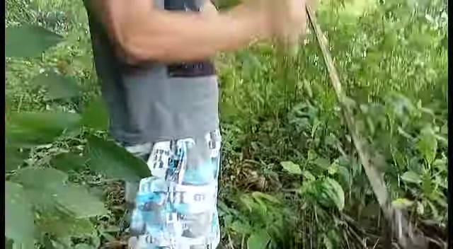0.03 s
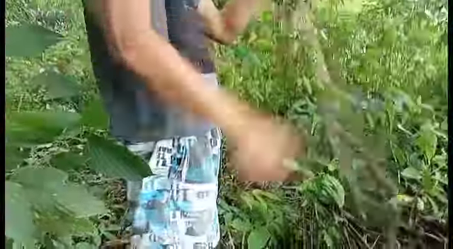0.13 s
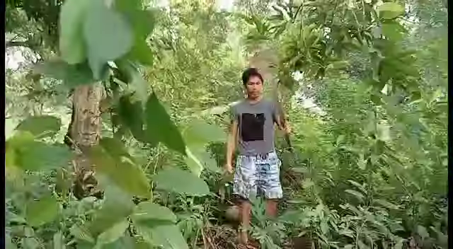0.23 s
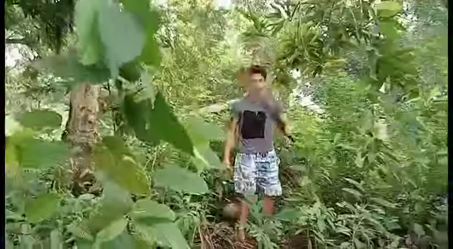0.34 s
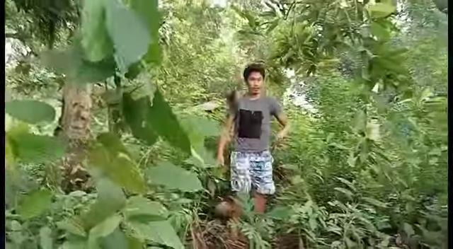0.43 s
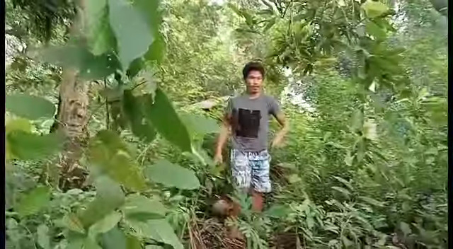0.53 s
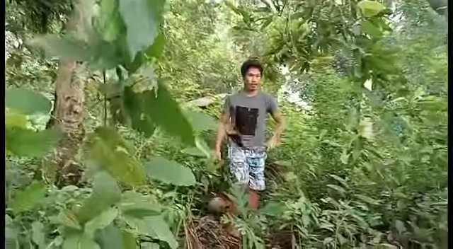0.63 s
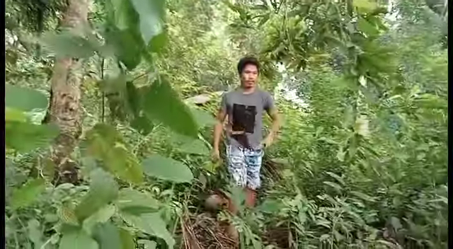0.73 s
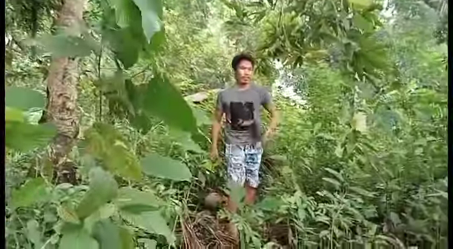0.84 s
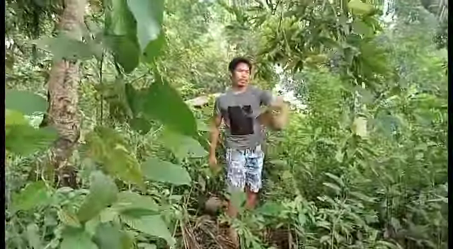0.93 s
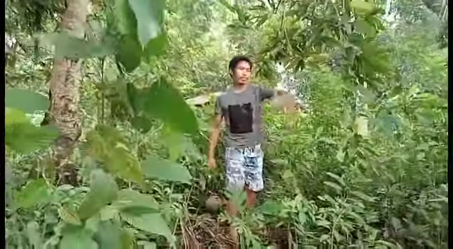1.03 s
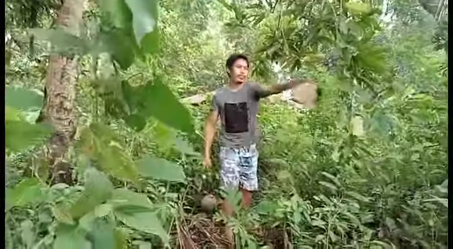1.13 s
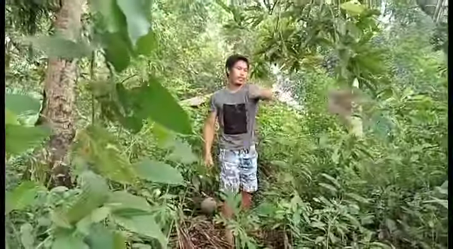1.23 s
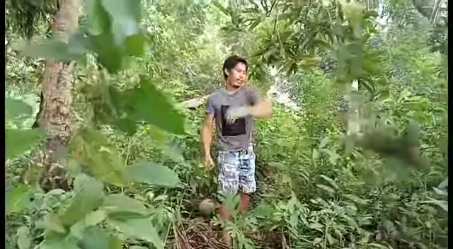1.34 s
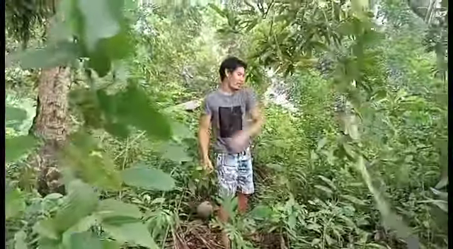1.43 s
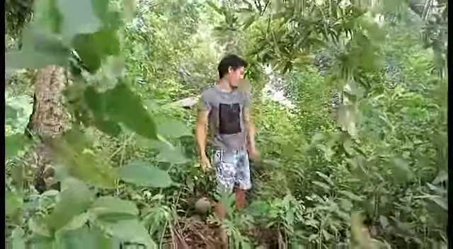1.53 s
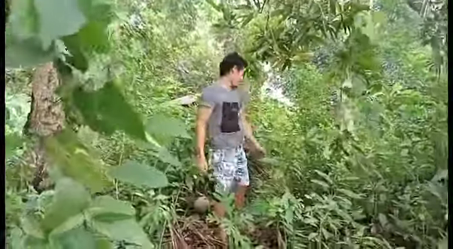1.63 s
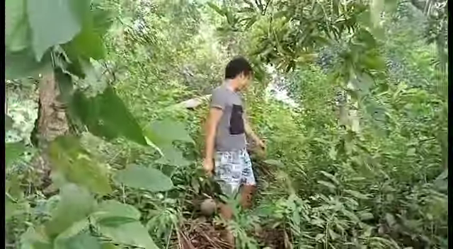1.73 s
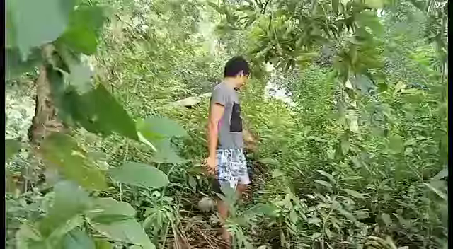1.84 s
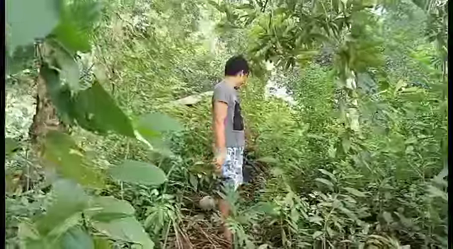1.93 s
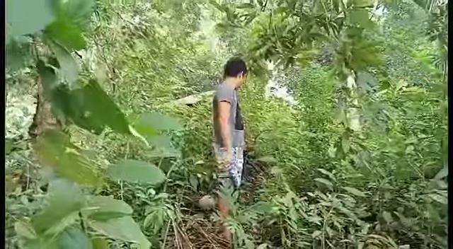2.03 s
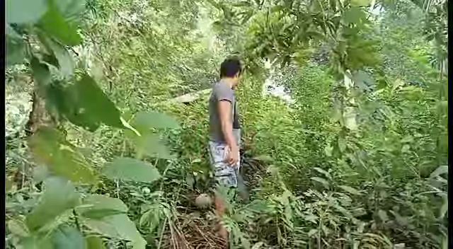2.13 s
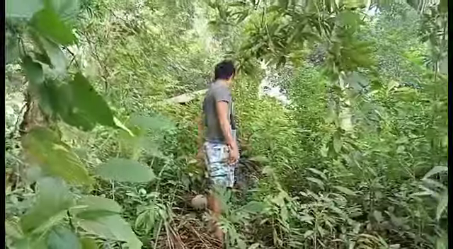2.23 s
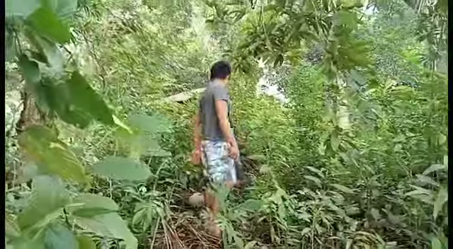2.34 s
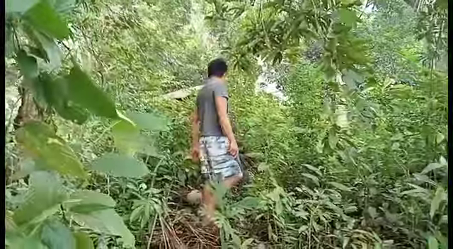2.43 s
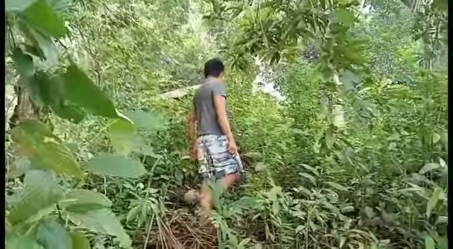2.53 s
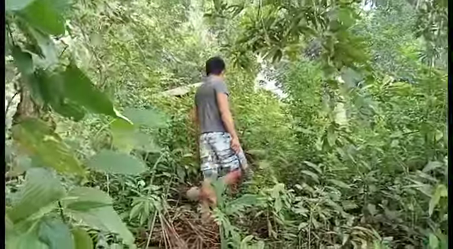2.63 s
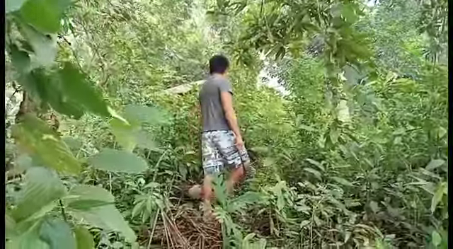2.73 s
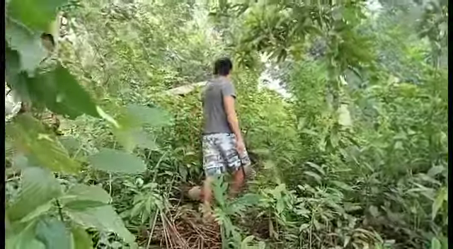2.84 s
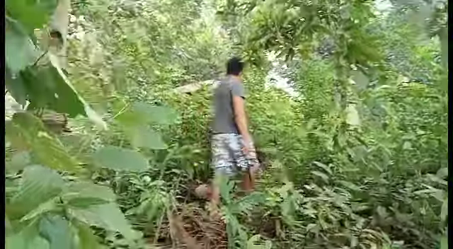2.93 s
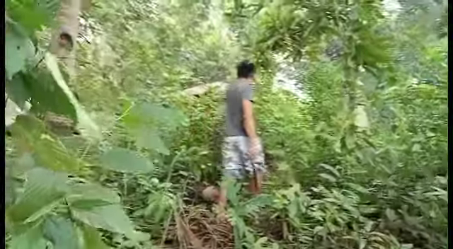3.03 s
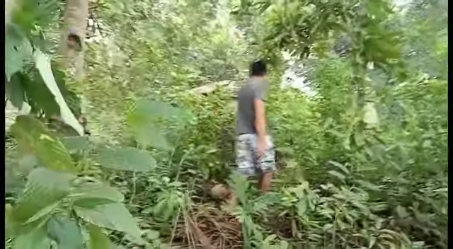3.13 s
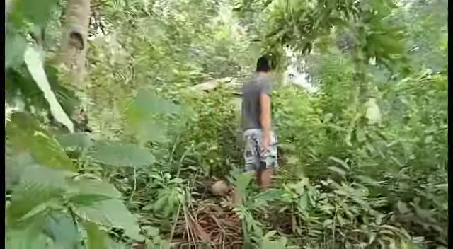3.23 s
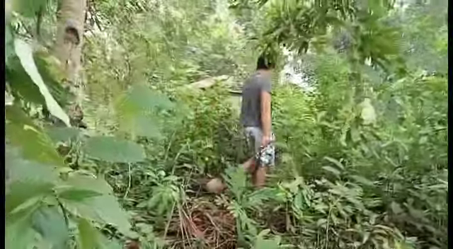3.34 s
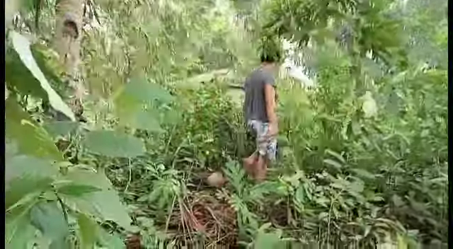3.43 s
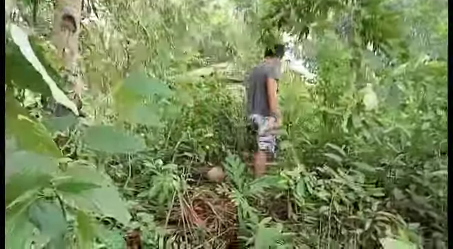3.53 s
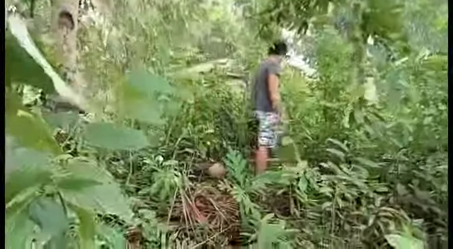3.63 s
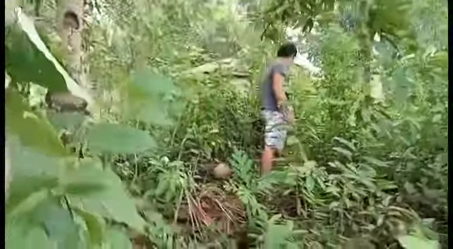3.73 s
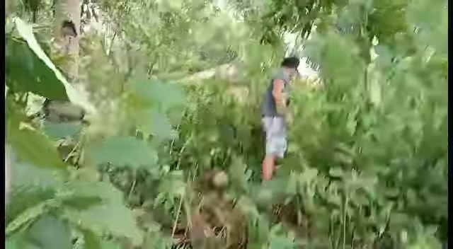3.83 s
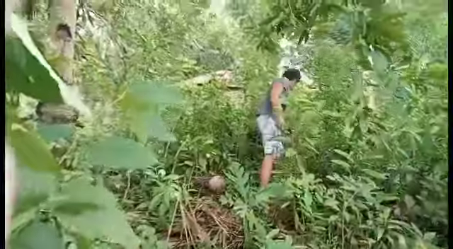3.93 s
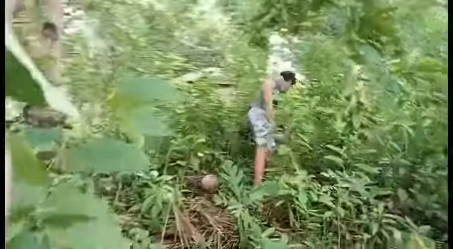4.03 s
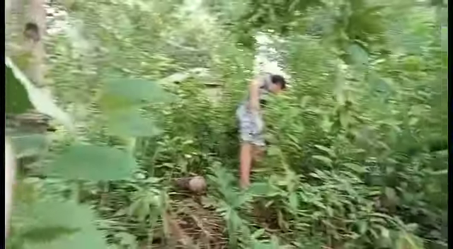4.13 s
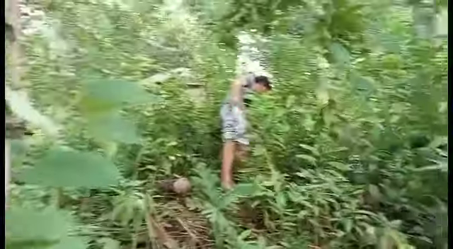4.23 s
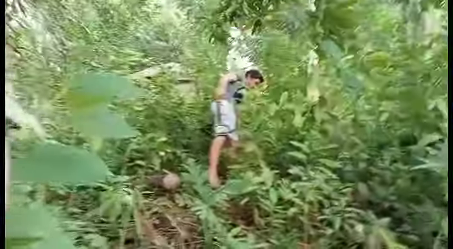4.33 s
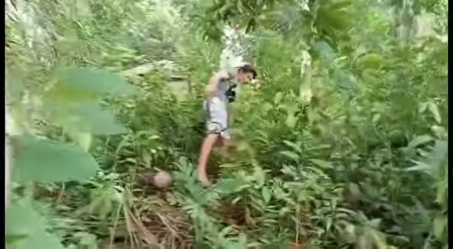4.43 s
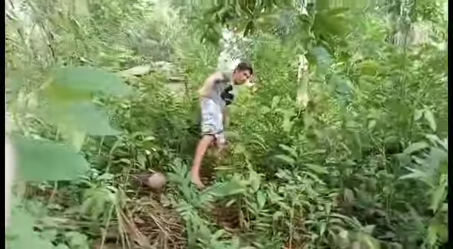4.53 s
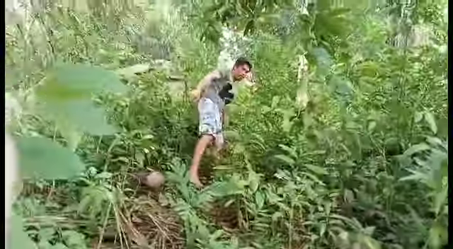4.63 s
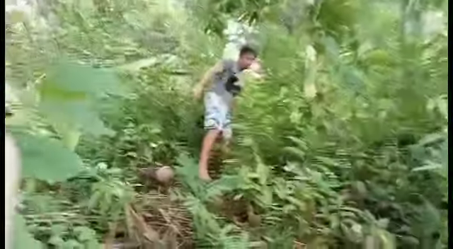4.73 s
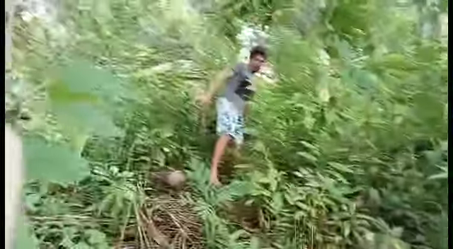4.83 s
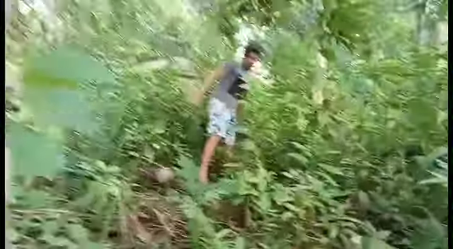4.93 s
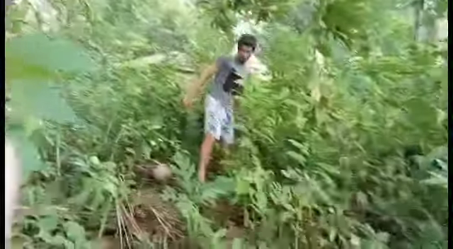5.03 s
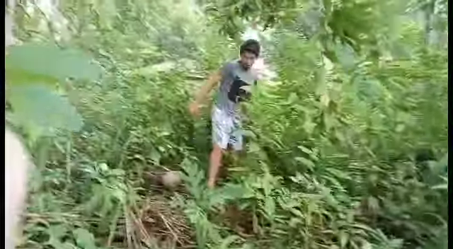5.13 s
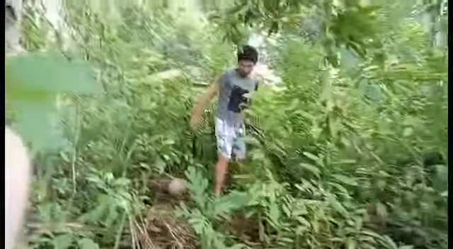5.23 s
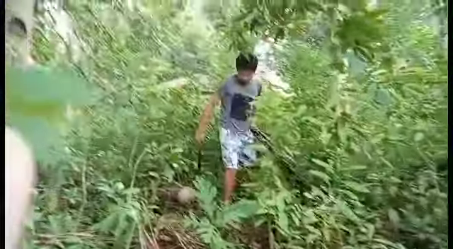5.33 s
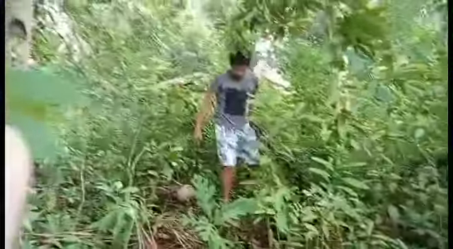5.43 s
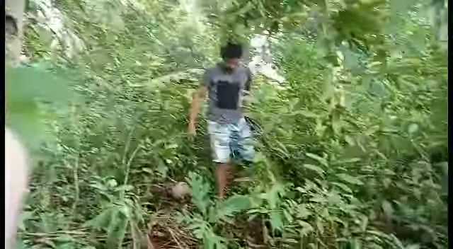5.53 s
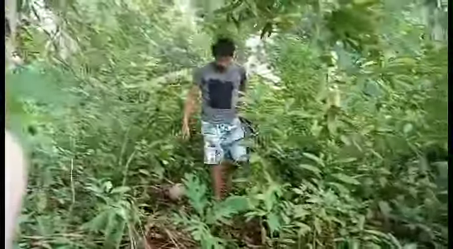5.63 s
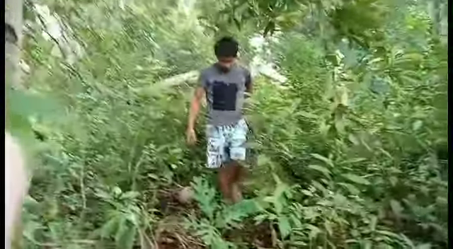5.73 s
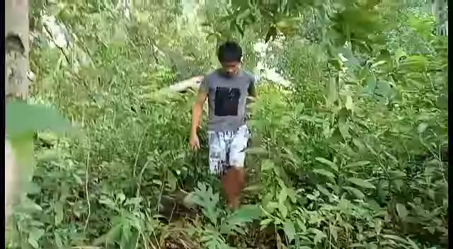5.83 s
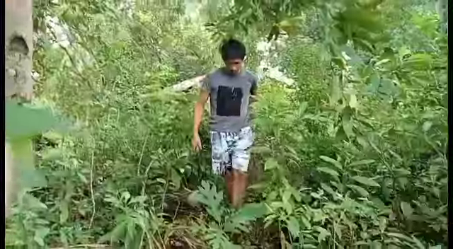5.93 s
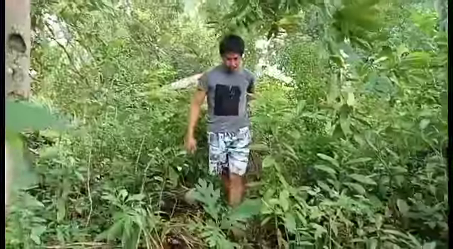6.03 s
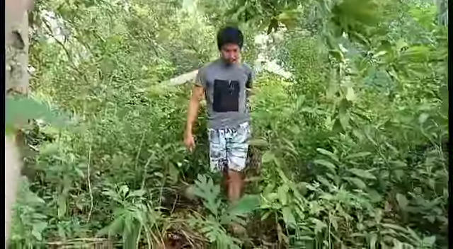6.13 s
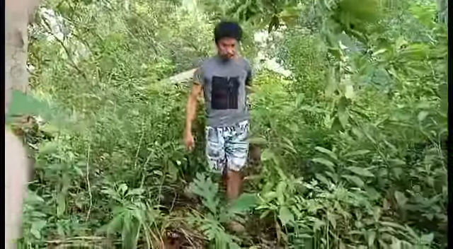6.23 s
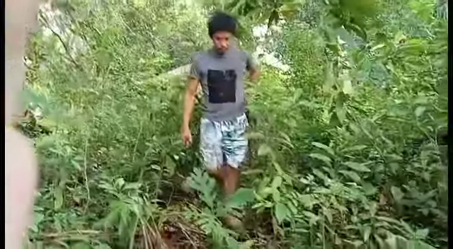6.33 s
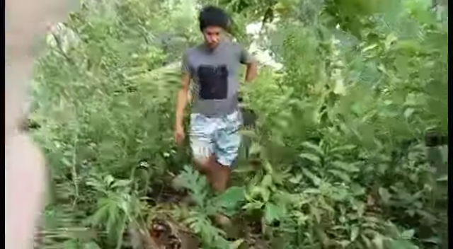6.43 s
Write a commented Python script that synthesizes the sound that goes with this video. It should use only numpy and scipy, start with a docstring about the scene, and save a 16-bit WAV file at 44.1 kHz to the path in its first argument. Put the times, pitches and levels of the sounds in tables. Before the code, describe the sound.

Faint rooster crows and insects in quiet foliage, then a loud twig snap and someone crashes through dry leafy undergrowth with rustling, swishing and cracking twigs.

```python
"""Leaves brush and crackle, stems swish and dry twigs snap as someone pushes on foot through thick undergrowth.
Far roosters crow, insects chirp and buzz, dull footfalls land, a hollow scrape comes late, a low rumble lies under.
Foliage is coloured noise partly gated by tiny contacts, its level jumping up abruptly at 0.27 s; twigs are noise
bursts through resonances; crowing is gliding sines with fluttering strands; insects and scrape are narrow bands.
One microphone feeds both channels."""
import sys
import numpy as np
from scipy import signal
from scipy.fft import rfft, irfft, next_fast_len
from scipy.io import wavfile
from scipy.ndimage import uniform_filter1d, map_coordinates

SR = 44100
rng = np.random.default_rng(int(sys.argv[2]) if len(sys.argv) > 2 else 0)


def transcribe(signal):
    """Save signal, clipped to [-1, 1], as a 16-bit WAV file at the path in sys.argv[1]."""
    frames = np.atleast_2d(signal).T
    limited = np.clip(frames, -1, 1)
    pcm = np.round(limited * 32767).astype(np.int16)
    wavfile.write(sys.argv[1], SR, pcm)


N = 285635

# Slowly varying rustle level of pushing through, before shaking; it jumps up abruptly at 0.27 s.
# Each row: time in seconds, leaves in dB, then stems, dry fizz and litter, each in dB over the leaves.
WADING = [(0.04, -70.5, 9.5, -7, 6.5), (0.266, -81.5, 16, -2, 15.5), (0.272, -58.5, 3.5, -3, 0.5),
          (0.36, -64, 3, -2, 1), (1.1, -65, -1.5, -9, -2), (1.5, -62, 2.5, -5.5, -4),
          (2.2, -60.5, 3.5, -10.5, -2), (3.0, -69.5, 0.5, -4, 1.5), (3.24, -51.5, -2, -5, -8),
          (3.36, -44.5, -1.5, -10.5, -11), (3.8, -41.5, 0, -6.5, -11.5), (4.3, -54.5, -0.5, -3, -10),
          (4.72, -39, -4.5, -7.5, -12), (5.2, -49, -3, -4, -10), (5.58, -34.5, -10, -6.5, -16),
          (5.95, -44.5, -6, -4.5, -15.5), (6.12, -37.5, -6, -6.5, -17.5), (6.477, -36, -6.5, -1.5, -15.5)]
# Branches brushed aside, before shaking. Each row: start in seconds, swell time in seconds, peak level in dB,
# fade in dB per second, then stems and litter in dB over the leaves.
BRUSHES = [(.38, 0.072, -53, 83, -6, -10), (.82, .08, -56, 32, 2, -3.5), (1.06, 0.073, -57.5, 71, 6, -3),
           (1.364, 0.016, -44, 104, -1, -5), (1.548, 0.014, -51, 119, -5.5, -24),
           (1.661, 0.07, -28, 67.5, -0.5, -10), (1.743, 0.0073, -24, 131, -0.5, -9),
           (2.36, 0.19, -55, 49, -5, -9.5), (3.255, .012, -38, 90, -19, -25),
           (3.4, 0.07, -37.5, 69, -7, -32), (3.57, 0.021, -42, 102, -6, -15),
           (3.846, 0.0048, -33, 52.5, -4, -10), (3.86, 0.048, -33.5, 101, 2, -21),
           (4.04, .01, -51, 123, -9, -26), (4.372, 0.0057, -44.5, 123, -2, -14),
           (4.43, 0.0088, -47, 86, -7, -12), (4.652, 0.008, -41.5, 102, -6, -13),
           (4.738, 0.01, -31.5, 72, -3, -10.5), (4.82, 0.073, -33.5, 110, -0.5, -13),
           (4.97, 0.025, -32.5, 210, -8.5, -14.5), (5.66, 0.0076, -26, 117, -9.5, -33),
           (6.05, 0.0055, -28.5, 150, -7.5, -25)]
# Tone colour of the leaves, before brightening. Each row: frequency in Hz, noise density in dB per Hz.
LEAF_COLOUR = [(2500, -120), (3800, -8), (5000, -4.5), (7000, 2), (9000, -2.5), (10500, -14.5),
               (13000, -29), (16000, -120)]
# Tone colour of the swishing stems, before brightening. Each row: frequency in Hz, noise density in dB per Hz.
STEM_COLOUR = [(940, -77), (1600, -20), (1750, -14), (2010, -10.5), (2480, -2.5), (3720, -4.5), (5000, 0.5),
               (6500, -1), (11000, -120)]
# Tone colour of the dry fizz. Each row: frequency in Hz, noise density in dB per Hz.
FIZZ_COLOUR = [(7000, -120), (8500, -5.5), (10000, -4), (12100, -6.5), (14000, -4), (15450, -11),
               (15650, -79)]
# Tone colour of the ground litter. Each row: frequency in Hz, noise density in dB per Hz.
LITTER_COLOUR = [(88, -18), (150, -10.5), (478, -4.5), (575, -4), (738, -6), (796, -4.5), (2000, -3.5),
                 (2600, -0.5), (4400, -120)]
# Where the leaves are lifted most, as the kind of foliage changes. Each row: time in seconds, centre in Hz.
LEAF_BRIGHTNESS = [(0, 5900), (.3, 8100), (.7, 9100), (1.05, 6700), (1.4, 7470), (2.4, 7270), (3, 7880),
                   (4.2, 8300), (4.6, 7670), (5.05, 8000), (5.45, 8900), (6.47, 8770)]
# Where the stems' swish is lifted most. Each row: time in seconds, centre in Hz.
STEM_BRIGHTNESS = [(0, 3220), (1.7, 3120), (1.85, 3200), (3.35, 3640), (3.65, 2800), (3.9, 3210),
                   (5.6, 3330)]
# Tone colour of the far rumble. Each row: frequency in Hz, noise density in dB per Hz.
RUMBLE_COLOUR = [(15, -62), (25, -34), (42, -19), (81, 1.5), (157, -3.5), (372, -12.5), (436, -13),
                 (600, -31), (780, -18), (1320, -120)]
# Twig snaps. Each row: start in seconds, peak of the crack in dB before the microphone, brightest pitch in Hz,
# peak of the woody knock in dB over the crack.
TWIG_SNAPS = [(0.022, -36.5, 4700, -6), (0.18, -52, 2680, 14), (1.556, -29.5, 6700, -15.5),
              (3.254, -1, 7050, -59), (3.431, -25.5, 8150, -33), (3.553, -21.5, 3660, -14),
              (3.642, -25, 6500, -30), (3.7905, -12, 13400, -36), (3.8513, -16, 7460, -23),
              (3.9247, -19, 7700, -25), (3.951, -19, 4000, -25), (4.0339, -4.5, 2720, -23),
              (4.099, -23, 6900, -28), (4.205, -28, 7100, -25), (4.2332, -23, 2420, -11.5),
              (4.2375, -24, 2300, -16), (4.3467, -25.5, 8500, -32), (4.3682, -16, 3320, -45),
              (4.4266, -18, 6240, -22), (4.6468, -11.5, 6940, -29), (4.652, -15, 8100, -23),
              (4.7427, -15, 3020, -11.5), (4.7718, -22, 7560, -25), (4.798, -16, 6940, -34),
              (4.814, -3, 7250, -54), (4.816, -14, 7360, -41), (5.003, -12.5, 8000, -30),
              (5.0607, -21.5, 7640, -22), (5.581, -18.5, 7910, -30), (5.6611, -6, 3900, -39),
              (5.663, -5, 9200, -20), (6.051, -9, 3950, -28), (6.123, -25, 8620, -23)]
# Dull footfalls. Each row: start in seconds, push level in dB before its onset and decay are applied.
FOOTFALLS = [(0.178, -40), (1.919, -33), (3.119, -44)]
# Crowing, one row a syllable. Each row: start in seconds, length in seconds, first pitch in Hz, last pitch in Hz,
# arch between them in Hz, level in dB, roughness from 0 to 1.
CROW_SYLLABLES = [(0.26, 0.21, 1660, 1644, -27.5, -63.5, 0.54), (0.503, .06, 1570, 1565, 0, -57, .1),
                  (0.617, 0.057, 1550, 1575, 0, -57, 0.06), (0.698, 0.14, 1550, 1560, -4, -63.5, 0.5),
                  (0.856, 0.11, 1265, 1260, -2, -62, 0.14), (4.099, 0.14, 1810, 1830, 47, -49.5, 0.7),
                  (4.279, 0.18, 1770, 1845, -21, -50.5, 0.4), (4.415, 0.15, 1920, 1882, 60.5, -49.5, 0.65),
                  (4.519, 0.16, 1816, 1788, 4.5, -48.5, 0.54), (4.867, 0.1, 1755, 1748, -1, -46, 0.06),
                  (5.036, 0.18, 1710, 1790, -2, -57.5, 0.5), (5.11, 0.04, 2074, 2050, 2, -46.5, 0.14),
                  (5.247, 0.11, 1837, 1874, 17, -51.5, 0.6), (5.385, 0.11, 1890, 1820, -3, -51, 0.2),
                  (5.485, 0.067, 1666, 1660, 4, -49.5, 0.6), (5.73, .12, 1760, 1745, 4, -50.5, 0),
                  (5.88, .38, 1750, 1690, 14, -47.5, .03)]
# High insect chirps in even bouts. Each row: first centre in seconds, number of chirps, top level in dB.
CHIRP_BOUTS = [(.46, 4, -63), (2.16, 1, -65), (2.492, 4, -62)]
# Swells of an insect's buzz. Each row: centre in seconds, top level in dB.
BUZZ_SWELLS = [(.66, -60), (.89, -60), (1.09, -54)]
# A lower, hoarse, gliding buzz. Each row: time in seconds, tone level in dB before it wavers, pitch in Hz.
HOARSE_BUZZ = [(2.28, -66, 2470), (2.4, -57, 2900), (2.5, -50.5, 2820), (2.62, -61, 2760),
               (3.05, -66, 2950)]
# A hollow scrape underfoot. Each row: time in seconds, level in dB before its fits.
SCRAPE_LEVEL = [(5.95, -60), (6.12, -54.5), (6.27, -53.5), (6.335, -44), (6.37, -52.5), (6.47, -57)]

TOUCH_DB = -11.5  # a brush starts this far under its peak
STILL_DB, BUSY_DB = -63, -35  # leaf levels between which the shaking grows to its full depth
RUMBLE_DB = -64  # before it wavers
CROW_EDGE_S = 0.046  # attack and release of a syllable
UNDER_DB = -13  # the crow's fundamental, an octave under the strongest partial, before roughness and fits
CHIRP_GAP_S, SWELL_S = 0.231, 0.078  # chirp spacing, and half-width of a buzz swell at 1/e of its top
TOP_HZ = 16667  # the microphone's band limit


def amp(db):
    """dB to gain."""
    return 10 ** (np.asarray(db) / 20)


def unit(x):
    """Scaled to rms 1."""
    return x / np.sqrt(np.mean(x ** 2) + 1e-20)


def along(points, hz):
    """Reads (Hz, value) points at hz on a log frequency axis."""
    f, v = np.transpose(points)
    return np.interp(np.log(hz + 1), np.log(f + 1), v)


def curves(rows):
    """One value per sample for each column after the time."""
    s, *cols = np.transpose(rows)
    return [np.interp(np.arange(N) / SR, s, c) for c in cols]


def sounding(rows, fade_s):
    """1 between a table's first and last time, with soft edges outside."""
    first, last = rows[0][0], rows[-1][0]
    return np.interp(np.arange(N) / SR, [first - fade_s, first, last, last + fade_s], [0, 1, 1, 0])


def wobble(rate):
    """A smooth random curve, rate knots a second."""
    knots = rng.standard_normal(int(N * rate / SR) + 4)
    return map_coordinates(knots, [np.arange(N) * rate / SR])


def filtered(x, response):
    """x shaped by a complex response of frequency."""
    m = next_fast_len(len(x) + 4096)
    return irfft(rfft(x, m) * response(np.fft.rfftfreq(m, 1 / SR)), m)[:len(x)]


def peak(hz, width_hz):
    """The response of a causal resonance."""
    return lambda f: 1j * f * width_hz / (hz * hz - f * f + 1j * f * width_hz)


def narrow_noise(hz, width_hz):
    """Noise through the same resonance twice; rms 1."""
    return unit(filtered(rng.standard_normal(N), lambda f: peak(hz, width_hz)(f) ** 2))


def contacts(rate, spread_db, life_s):
    """Loudness of many brief leaf contacts: sudden starts, quick decays, a few much stronger; rms 1."""
    strength = amp(spread_db * np.minimum(rng.exponential(size=N), 3))
    starts = (rng.random(N) < rate / SR) * strength
    return unit(signal.lfilter([1], [1, -np.exp(-1 / (life_s * SR))], starts))


def rustle(colour, grain, share, patchy_db):
    """Noise, patchy in time and frequency, partly gated by leaf contacts, in one colour; rms 1."""
    z = signal.stft(rng.standard_normal(N + 512), nperseg=256)[2]
    patches = uniform_filter1d(rng.standard_normal(z.shape), 4, 0)  # across frequency
    patches = uniform_filter1d(patches, 10, 1)  # across time
    noise = signal.istft(z * amp(patchy_db * unit(patches)), nperseg=256)[1][:N]
    return unit(filtered(noise * (1 + share * grain), lambda hz: amp(along(colour, hz))))


def brightened(x, track, width_hz, lift_db):
    """A bump in the spectrum that follows the foliage; rms 1."""
    hz, t, z = signal.stft(x, SR, nperseg=256)
    centre = np.interp(t, *np.transpose(track))
    bump = amp(lift_db * np.exp(-((hz[:, None] - centre) / width_hz) ** 2))
    return unit(signal.istft(z * bump, SR, nperseg=256)[1][:N])


def crackle(rate, centre_hz, turns):
    """Small dry leaves flick over, each a few cycles at its own pitch, in clumps; rms 1."""
    when, pitch = rng.random((int(N * rate / SR), 2)).T
    start = (when * N).astype(int)
    hz = centre_hz * np.exp(1.6 * (pitch - .5))[:, None]
    t = np.arange(128) / SR
    flick = np.sin(2 * np.pi * hz * t) * np.exp(-t * hz / turns)
    places = start[:, None] + np.arange(128)
    flicks = np.bincount(places.ravel(), flick.ravel(), N + 128)[:N]
    return unit(amp(5.6 * wobble(18)) * flicks)


def brush():
    """Leaves, stems, dry edges and litter share the same contacts and the same shaking."""
    wade_db, stem_db, fizz_db, litter_db = curves(WADING)
    start, swell, top_db, fade, b_stem_db, b_litter_db = np.transpose(BRUSHES)[:, :, None]
    since = np.arange(N) / SR - start
    rise_db = TOUCH_DB * (1 - since / swell)
    fall_db = -fade * (since - swell)
    pushed_power = (since > 0) * amp(top_db + np.minimum(rise_db, fall_db)) ** 2

    def level(waded_db, brushed_db):
        """The rustle of pushing through and the single brushes add as powers."""
        brushed_power = (pushed_power * amp(brushed_db) ** 2).sum(axis=0)
        return np.sqrt(amp(wade_db + waded_db) ** 2 + brushed_power)

    leaf_level = level(0, 0)
    busy = np.interp(20 * np.log10(leaf_level), [STILL_DB, BUSY_DB], [.3, 1])
    shake = amp(busy * (wobble(14) + 1.6 * wobble(60)))
    grain = contacts(rate=530, spread_db=7.0, life_s=0.00088)
    leaves = rustle(LEAF_COLOUR, grain, share=0.28, patchy_db=2)
    leaves = brightened(leaves, LEAF_BRIGHTNESS, width_hz=1370, lift_db=9.5)
    stems = rustle(STEM_COLOUR, grain, share=0.33, patchy_db=2)
    stems = brightened(stems, STEM_BRIGHTNESS, width_hz=640, lift_db=7.5)
    fizz = amp(fizz_db) * rustle(FIZZ_COLOUR, grain, share=0.061, patchy_db=0)  # evenly spread
    litter = rustle(LITTER_COLOUR, grain, share=0.26, patchy_db=1.5)
    flicks = amp(-18.0) * crackle(rate=500, centre_hz=5580, turns=4.4)
    foliage = leaf_level * (leaves + fizz + flicks)
    foliage += level(stem_db, b_stem_db) * stems
    foliage += level(litter_db, b_litter_db) * litter
    return shake * foliage


def rumble():
    """A far low rumble: coloured noise that wavers slightly in level."""
    noise = unit(filtered(rng.standard_normal(N), lambda hz: amp(along(RUMBLE_COLOUR, hz))))
    return amp(RUMBLE_DB + wobble(13.0)) * noise


def twigs():
    """A snap is a burst of fibres breaking, brightest at one pitch, with a duller knock; foliage scatters it back."""
    out, t = np.zeros(N + SR), np.arange(SR // 4) / SR
    for s, db, hz, body_db in TWIG_SNAPS:
        fibres, wood, scatter = rng.standard_normal((3, len(t)))
        # first break, then splinters; each time is a 60 dB fall in seconds
        burst = fibres * (amp(-60 * t / 0.011) + 0.45 * amp(-60 * t / 0.02))
        burst += amp(-19.0) * scatter * amp(-60 * t / 0.18) * (1 - np.exp(-t / 0.0013))
        crack = filtered(burst, lambda f: peak(hz, .6 * hz)(f) ** 2 + amp(-6.0) * peak(9000, 12000)(f) ** 2)
        knock = filtered(wood * amp(-60 * t / 0.015), lambda f: peak(1300, 1800)(f) ** 2)
        sound = crack / abs(crack).max() + amp(body_db) * knock / abs(knock).max()
        out[round(s * SR):][:len(t)] += amp(db) * sound
    return out[:N]


def footfalls():
    """Each footfall is a low damped push: a 70 Hz sine with a soft onset."""
    out, t = np.zeros(N), np.arange(SR // 8) / SR
    for s, db in FOOTFALLS:
        decay = amp(db - 60 * t / 0.081)
        onset = 1 - np.exp(-t / 0.0056)
        out[round(s * SR):][:len(t)] += decay * np.sin(2 * np.pi * 70 * t) * onset
    return out


def roosters():
    """Distance leaves one arching partial and a trace of fundamental; hoarseness scatters it into strands."""
    out, t = np.zeros(N), np.arange(N) / SR
    fits = amp(6 * wobble(12) - 4)  # the fundamental comes and goes
    drift, flutter_sin, flutter_cos = wobble(60), wobble(170), wobble(170)
    for s, length, first_hz, last_hz, arch_hz, db, rough in CROW_SYLLABLES:
        u = np.clip((t - s) / length, 0, 1)
        hz = first_hz + (last_hz - first_hz) * u + arch_hz * np.sin(np.pi * u)
        turn = 2 * np.pi * np.cumsum(hz * (1 + 0.00298 * drift)) / SR
        clear = np.sqrt(1 - rough) * np.sin(turn)
        under = amp(UNDER_DB) * np.sqrt(rough) * fits * np.sin(turn / 2)
        strands = np.sqrt(rough / 2) * (flutter_sin * np.sin(turn) + flutter_cos * np.cos(turn))
        edges = np.clip(np.minimum(t - s, s + length - t) / CROW_EDGE_S + .5, 0, 1)
        out += edges * np.sqrt(2) * amp(db) * (clear + under + strands)
    return out


def insect_chirps():
    """Short high chirps: evenly spaced bell-shaped pulses of narrow noise."""
    t = np.arange(N) / SR
    beat = np.zeros(N)
    for s, chirps, db in CHIRP_BOUTS:
        for k in range(round(chirps)):
            beat += amp(db) * np.exp(-((t - s - k * CHIRP_GAP_S) / 0.023) ** 2)
    noise = rng.standard_normal(N)
    return beat * unit(filtered(noise, lambda f: peak(14300, 2600)(f) ** 2 * (f < 15550)))


def insect_buzz():
    """A narrow band of noise around 5 kHz that swells and sinks."""
    t = np.arange(N) / SR
    swells = sum(amp(db) * np.exp(-((t - s) / SWELL_S) ** 2) for s, db in BUZZ_SWELLS)
    return swells * narrow_noise(5000, 640)


def hoarse_buzz(width_hz, under_hz, under_db):
    """A fuzzy insect tone that glides, over a weaker fixed band."""
    db, hz = curves(HOARSE_BUZZ)
    turn = 2 * np.pi * np.cumsum(hz) / SR
    core = unit(wobble(width_hz) * np.sin(turn) + wobble(width_hz) * np.cos(turn))
    under = amp(under_db) * narrow_noise(under_hz, width_hz)
    return sounding(HOARSE_BUZZ, 0.04) * amp(db + 2.7 * wobble(14)) * (core + under)


def hollow_scrape():
    """A hollow scrape underfoot: narrow noise on a level curve, coming in fits."""
    level = sounding(SCRAPE_LEVEL, 0.044) * amp(curves(SCRAPE_LEVEL)[0])
    return level * narrow_noise(1050, 370) * amp(2.0 * wobble(25) - 2.5)


def scene():
    """All sources reach one microphone, which feeds both channels."""
    mono = brush() + rumble() + twigs() + footfalls() + roosters()
    mono += insect_chirps() + insect_buzz() + hoarse_buzz(width_hz=400, under_hz=2030, under_db=-7)
    mono += hollow_scrape()
    return np.array([mono, mono])


def record(dry):
    """The microphone passes little of the very top, and nothing above its band limit."""
    def response(hz):
        """A steep drop to a low shelf, then silence."""
        return amp(np.interp(hz, [15450, 15700], [0, -22])) * (hz < TOP_HZ)

    return np.array([filtered(x, response) for x in dry])


dry = scene()
out = record(dry)
transcribe(out)
```